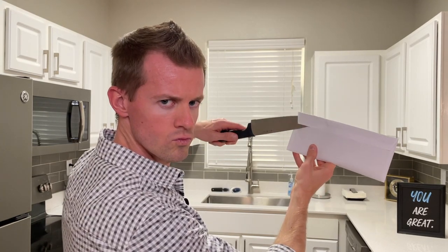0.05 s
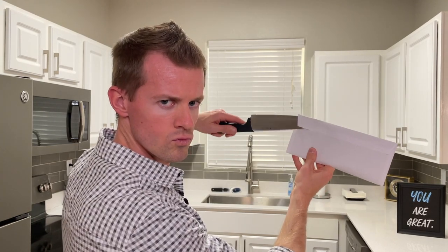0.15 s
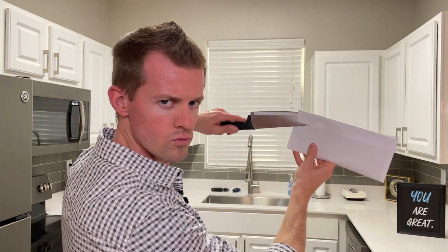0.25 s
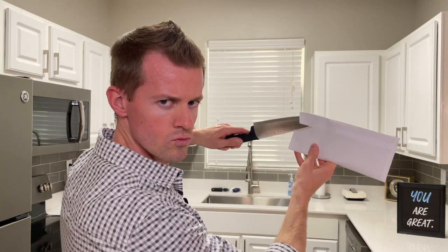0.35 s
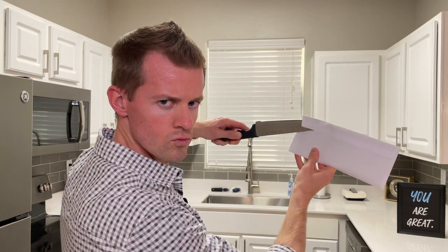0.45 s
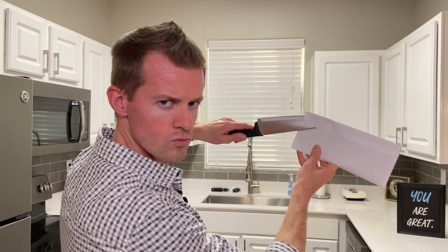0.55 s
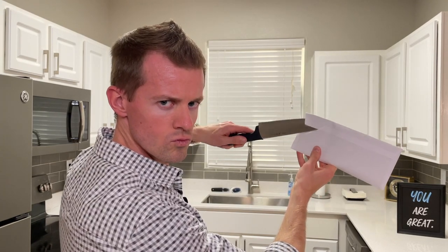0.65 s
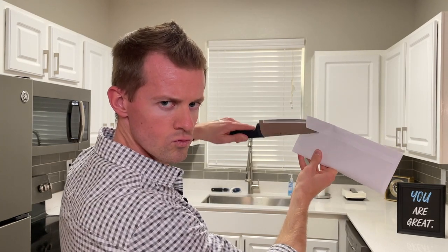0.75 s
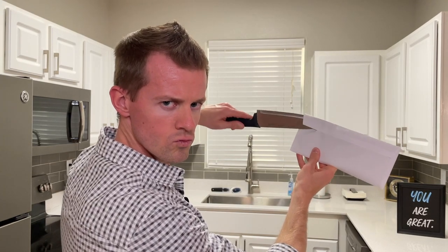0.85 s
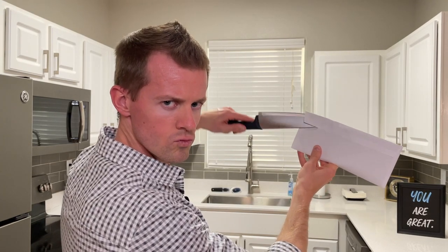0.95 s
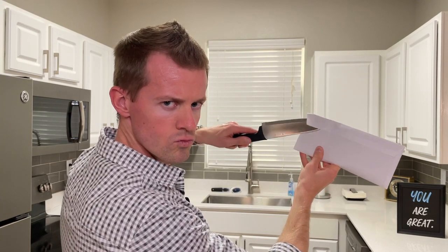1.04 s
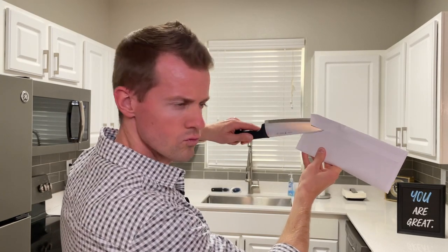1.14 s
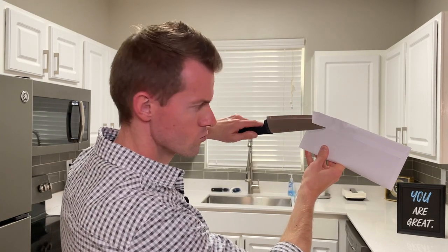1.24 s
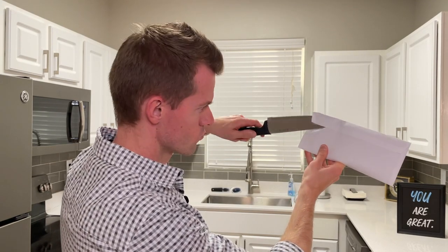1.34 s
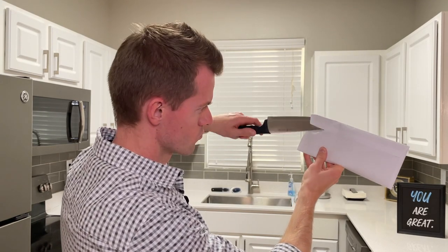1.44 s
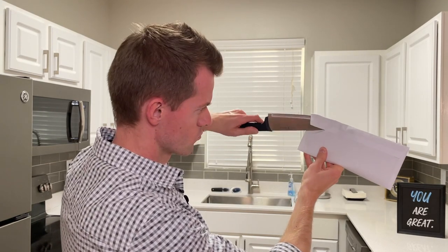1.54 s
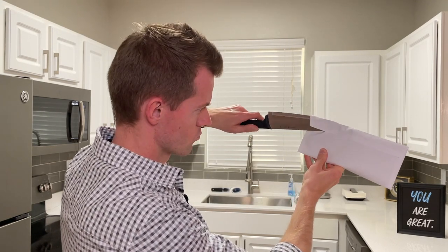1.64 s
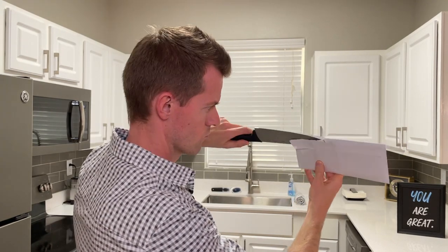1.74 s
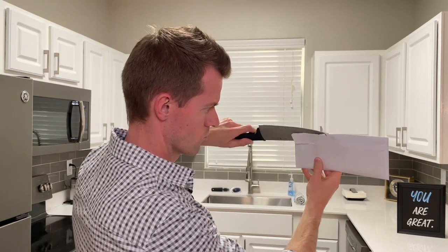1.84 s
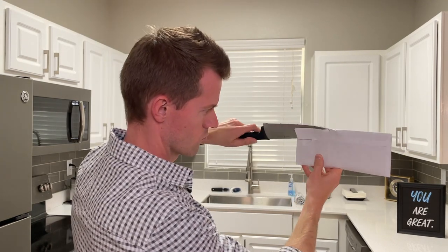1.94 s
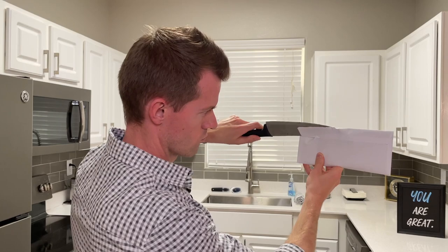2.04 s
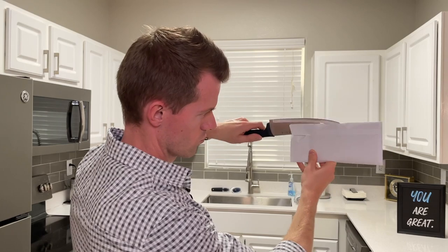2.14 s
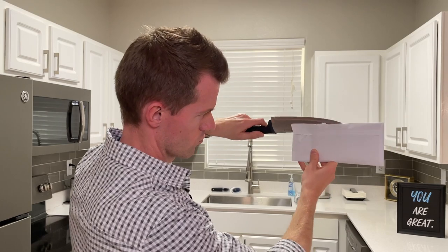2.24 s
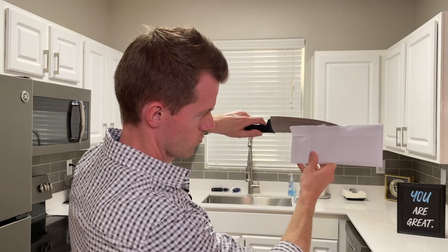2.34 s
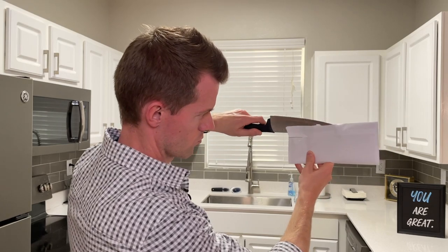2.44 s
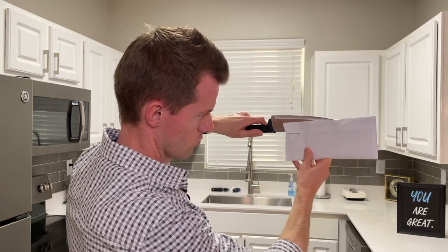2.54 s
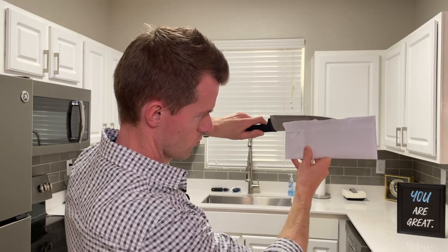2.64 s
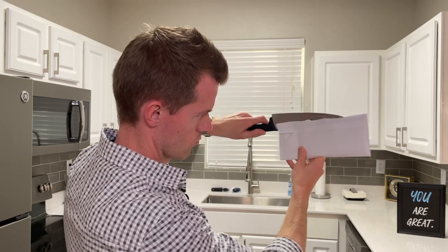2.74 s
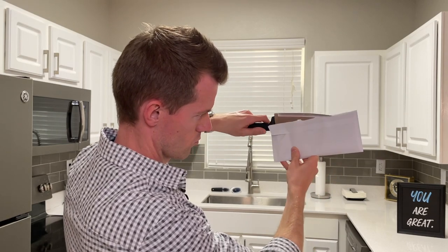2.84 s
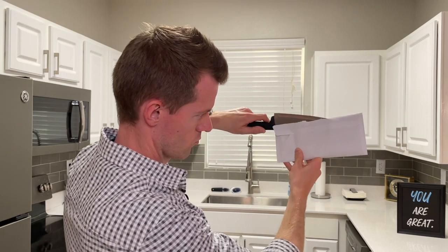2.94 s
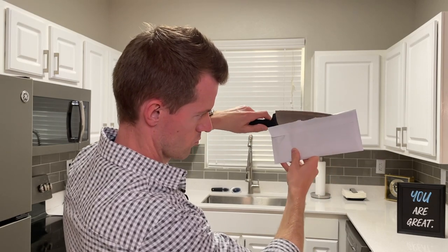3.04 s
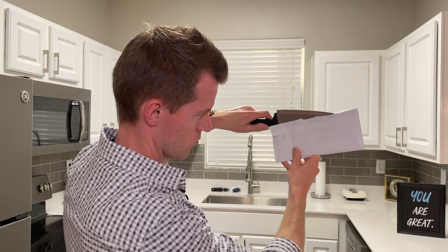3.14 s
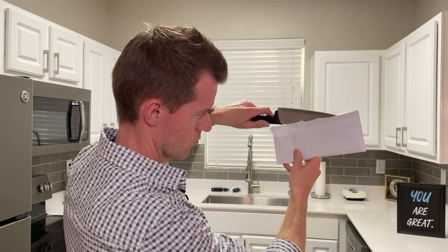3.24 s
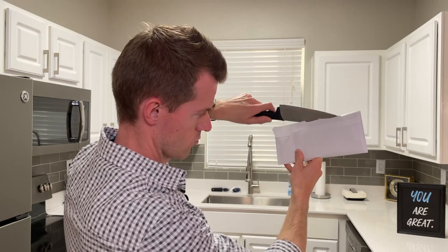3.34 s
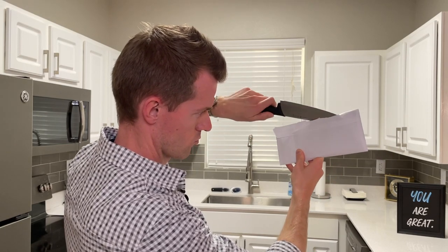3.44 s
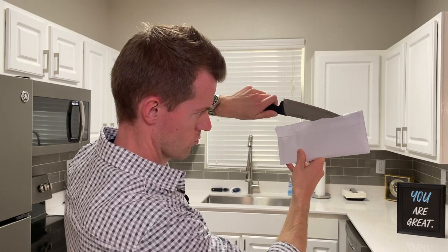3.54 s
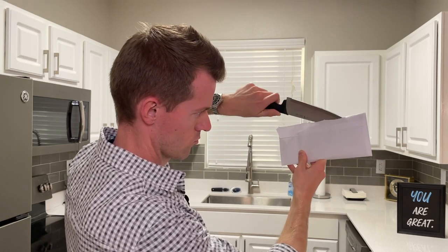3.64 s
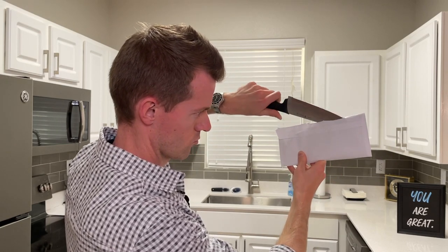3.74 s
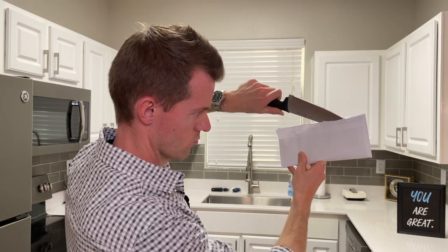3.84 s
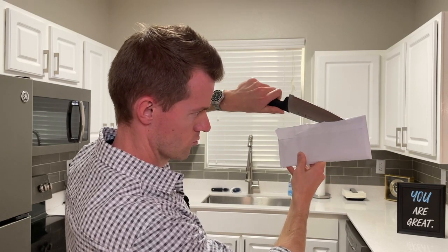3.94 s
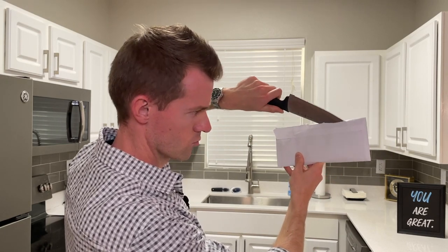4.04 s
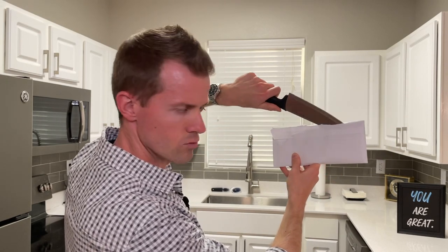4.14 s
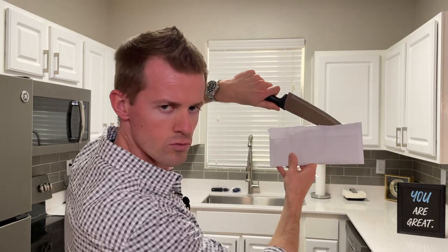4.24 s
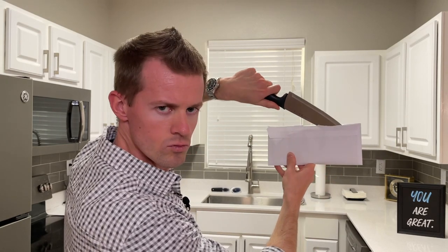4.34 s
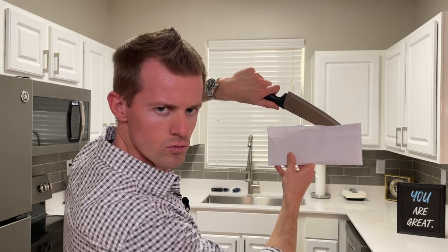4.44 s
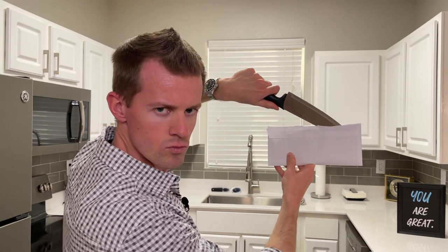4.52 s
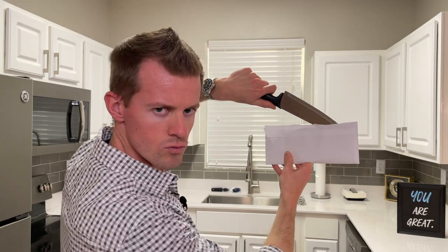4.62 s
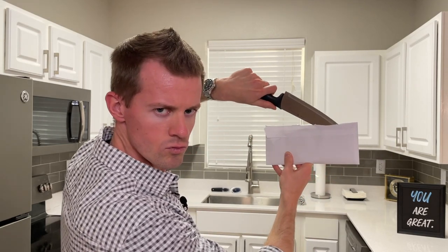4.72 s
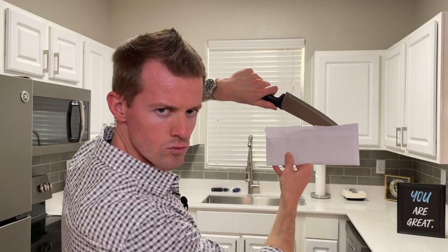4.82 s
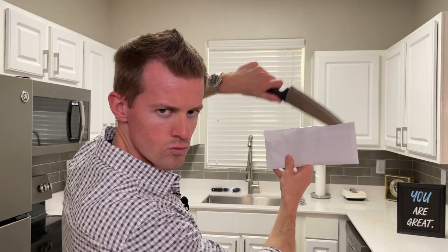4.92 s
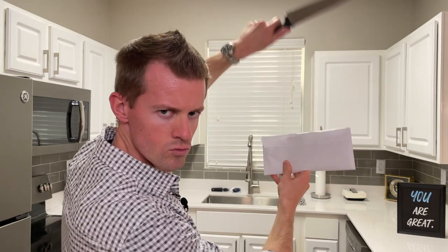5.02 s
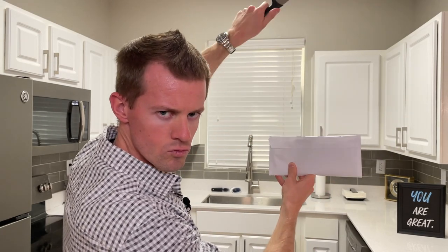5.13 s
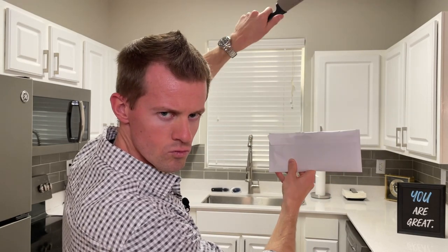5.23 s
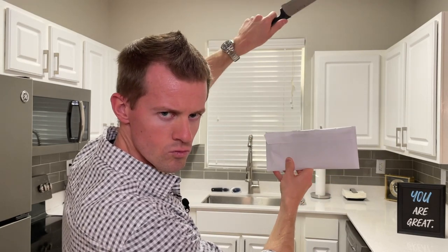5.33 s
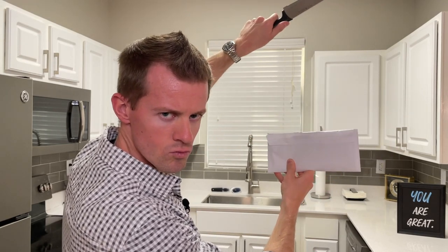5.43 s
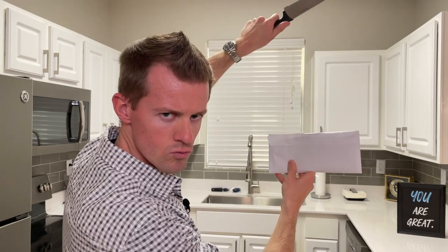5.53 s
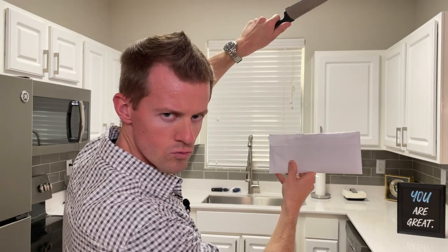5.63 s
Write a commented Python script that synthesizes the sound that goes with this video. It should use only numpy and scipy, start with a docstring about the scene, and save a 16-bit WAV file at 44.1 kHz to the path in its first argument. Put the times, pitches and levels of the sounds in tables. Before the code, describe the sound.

A knife saws dryly along a paper envelope with scratchy strokes and crisp snaps, then pauses and rips through with a short sharp whoosh.

```python
"""A knife saws along the fold of a paper envelope in a hard-walled kitchen, close to a microphone on the shirt.
The blade rubs in short strokes of grainy noise, fibres snap as millisecond bursts and the sheet sounds along.
At last the corner rips through with a whoosh, a climbing ring and a jolt of the shirt; the paper ticks twice more.
The kitchen answers with a decaying noise wash, cloth shifts against the microphone and an appliance hums."""
import sys
import numpy as np
from scipy import signal
from scipy.fft import rfft, irfft, next_fast_len
from scipy.io import wavfile
from scipy.ndimage import uniform_filter1d

SR = 44100
rng = np.random.default_rng(int(sys.argv[2]) if len(sys.argv) > 2 else 0)


def master(y):
    """Save y as 16-bit WAV."""
    cut = np.clip(np.atleast_2d(y).T, -1, 1)
    pcm = np.round(cut * 32767)  # scale
    wavfile.write(sys.argv[1], SR, pcm.astype(np.int16))


N = 250399
TIME = np.arange(N) / SR
SIZE = next_fast_len(N + SR)
FREQ = np.maximum(np.arange(SIZE // 2 + 1) * SR / SIZE, 1)


def from_db(db):
    """Decibels to amplitude gain."""
    return 10 ** (np.asarray(db) / 20)


def rms_one(x):
    """Scale to rms 1."""
    return x / np.sqrt(np.mean(x ** 2) + 1e-20)


def in_time(rows):
    """Each column of a curve at every sample."""
    s, *columns = np.transpose(rows)
    return [np.interp(TIME, s, column) for column in columns]


def at_hz(points, hz):
    """Read a table on a log-frequency axis."""
    table_hz, value = np.transpose(points)
    return np.interp(np.log(hz), np.log(table_hz), value)


def drift(rate_hz):
    """Slow random wander of spread 1: noise through two equal low-pass poles, at a coarse step."""
    step = 40  # samples
    pole = np.exp(-2 * np.pi * rate_hz * step / SR)
    white = rng.standard_normal(N // step + 2002)
    slow = signal.lfilter([1], [1, -2 * pole, pole * pole], white)[2000:]  # settled part
    return np.interp(np.arange(N) / step, np.arange(len(slow)), rms_one(slow))


def shaped(x, gain):
    """Causal (minimum-phase) filter with the given gain curve, scaled to keep the power of white noise."""
    cepstrum = irfft(np.log(rms_one(gain) + 1e-6), SIZE)
    # folding the cepstrum onto positive time makes the filter causal
    cepstrum[1:SIZE // 2] *= 2
    cepstrum[SIZE // 2 + 1:] = 0
    return irfft(rfft(x, SIZE) * np.exp(rfft(cepstrum)), SIZE)[:N]


def band_noise(low_hz, high_hz):
    """Filter sections of a gentle band-pass."""
    return signal.butter(2, [low_hz, high_hz], "band", fs=SR, output="sos")


def stroke_effort():
    """Gains of the sawing strokes; the blade drags on after each one and the sheet rustles."""
    # strokes along the fold: (start [s], attack [s], length [s], rasp at mid-stroke [dB],
    # swell from start to end [dB], sheet body re rasp [dB], fibre sizzle re rasp [dB])
    strokes = [ (0, 0.0027, 0.15, -54.5, -15, -4.5, -1.5), (.108, 0.036, 0.19, -58, -17, -3, 4),
               (.26, 0.015, 0.093, -48.5, 19, -8, -1), (.41, 0.011, 0.068, -53, -18.5, 0, 6.5),
               (.49, 0.0045, 0.17, -58.5, -3.5, 2, -2), (.59, 0.053, 0.094, -49, -8.5, -2, -7.5),
               (.722, 0.013, 0.18, -52.5, -6.5, -5.5, 0), (.932, 0.015, 0.105, -42.5, 9.5, -9.5, -1.5),
               (1.175, 0.0027, 0.078, -53.5, 9.5, -8.5, 0.5), (1.322, 0.048, 0.053, -46.5, 10, -9.5, 0),
               (1.405, 0.018, 0.095, -44, 2.5, 0, -1.5), (1.581, 0.0028, 0.12, -42.5, 1, -8.5, 1.5),
               (1.75, 0.0032, 0.017, -44, -1.5, -17, 8.5), (1.829, 0.013, 0.042, -44, -3, -14.5, 6),
               (1.89, 0.036, 0.035, -46.5, -3.5, -2.5, 4.5), (2.015, 0.0032, 0.039, -53.5, 8, -5, 3),
               (2.06, 0.014, 0.1, -31.5, 3, -15.5, 1.5), (2.17, 0.0066, 0.19, -55, -19.5, -1, -6.5),
               (2.305, 0.032, 0.043, -52, 9, -11.5, -7.5), (2.39, 0.079, 0.12, -37.5, -0.5, -13, 3.5),
               (2.655, 0.0038, 0.05, -33.5, 4, -8, -0.5), (2.715, 0.014, 0.12, -34.5, -12.5, -13, 0),
               (2.85, 0.084, 0.088, -41.5, -22, -14.5, 6), (2.953, 0.014, 0.054, -37.5, 19, -13, -1.5),
               (3.185, 0.021, 0.041, -48.5, -3, -11, -3), (3.24, 0.015, 0.14, -55.5, 9.5, -9.5, 4.5),
               (3.551, 0.004, 0.047, -59.5, -18, -10, 0), (3.666, 0.018, 0.023, -42.5, -2.5, -11, -1),
               (4.223, 0.0033, 0.021, -50, 15.5, -13, -5.5)]
    return effort(strokes, release_s=0.0097, drag_s=0.11, drag_db=-24.0, rustle_db=-15.5)


def effort(rows, release_s, drag_s, drag_db, rustle_db):
    """Gains of rasp, body and sizzle: each stroke grips, swells or eases, lets go and lingers lightly."""
    t = np.arange(SR) / SR
    power = np.zeros((3, N + SR))
    lingering = from_db([[drag_db], [rustle_db], [drag_db]])
    for start_s, attack_s, length_s, db, swell_db, body_db, sizzle_db in rows:
        attack = np.sin(np.pi / 2 * np.clip(t / attack_s, 0, 1)) ** 2
        hold = from_db(db + swell_db * (np.clip(t / length_s, 0, 1) - .5))
        after = np.maximum(t - length_s, 0)
        release = (1 - lingering) * np.exp(-after / release_s) + lingering * np.exp(-after / drag_s)
        balance = from_db([[0], [body_db], [sizzle_db]])
        first = max(round(start_s * SR), 0)
        power[:, first:first + SR] += (attack * hold * release * balance) ** 2
    return np.sqrt(power[:, :N])


def sawing(gains):
    """The blade rubs along the fold: catching friction with resonances that change under the blade."""
    # spectrum of rubbed paper: (frequency [Hz], density [dB per Hz])
    rub_colour = [(90, -22.5), (200, -12.5), (400, -1.5), (1800, -2), (2700, -4), (4000, -1.5), (6200, 5),
                  (7500, -1), (10700, -10), (13600, -10), (16000, -22.5)]
    rub = friction(gains, rub_colour, catches_per_s=500, size_db=3.0, grain_share=0.35,
                   flutter_db=1.8, flutter_hz=60)
    return wandering_resonances(rub, depth_db=3, rate_hz=7)


def friction(gains, colour, catches_per_s, size_db, grain_share, flutter_db, flutter_hz):
    """Fibres catch and slip on the edge: sub-millisecond grains of uneven size over a smooth rub."""
    decay_s = 0.00017
    sizes = from_db(size_db * np.minimum(rng.exponential(1, N), 3))
    catches = (rng.random(N) < catches_per_s / SR) * sizes
    grains = signal.lfilter([1], [1, -np.exp(-1 / (decay_s * SR))], catches ** 2 + 1e-18)
    power = 1 - grain_share + grain_share * grains / grains.mean()
    grip = rms_one(np.sqrt(power) * from_db(flutter_db * drift(flutter_hz)))
    rasp, body, sizzle = gains * grip * rng.standard_normal((3, N))
    return paper(rasp, body, sizzle, colour)


def wandering_resonances(x, depth_db, rate_hz):
    """The free span of paper changes under the blade, so narrow regions of its spectrum swell and fade."""
    centres = np.geomspace(400, 15000, 44)  # Hz
    spectrum, out = rfft(x, SIZE), 0
    for share in np.eye(len(centres)):
        band = irfft(spectrum * np.interp(FREQ, centres, share), SIZE)[:N]
        out = out + band * from_db(depth_db * drift(rate_hz))
    return out / from_db(depth_db ** 2 * np.log(10) / 20)  # undoes the mean power gain of the wander


def paper(rasp, body, sizzle, colour):
    """The cut edge rasps in the middle, the whole sheet sounds below it and single fibres above it."""
    # resonances of the envelope and the blade: (centre [Hz], width [Hz], height [dB])
    paper_modes = [(850, 56, 2), (3450, 340, 1), (10940, 1700, 6.5)]
    body_edge_hz, sizzle_edge_hz = 2500, 8000
    peaks_db = sum(db / (1 + (2 * (FREQ - hz) / width) ** 2) for hz, width, db in paper_modes)
    gain = from_db(at_hz(colour, FREQ) + peaks_db)
    low = 1 / (1 + (FREQ / body_edge_hz) ** 8)
    high = 1 / (1 + (sizzle_edge_hz / FREQ) ** 10)
    middle = (1 - low) * (1 - high)
    regions = ((rasp, middle), (body, low), (sizzle, high))
    return sum(shaped(x, gain * np.sqrt(share)) for x, share in regions)


def chirps(width):
    """The edge catches and a short span of paper chirps: one narrow resonance swells and dies each time."""
    # chirps: (start [s], length [s], frequency [Hz], level [dB])
    catches = [(1.83, .026, 2050, -46.5), (3.198, 0.029, 4500, -45.5), (3.668, 0.029, 4300, -39)]
    out = 0
    for start_s, length_s, hz, db in catches:
        band = band_noise(hz * (1 - width), hz * (1 + width))
        swell = np.sin(np.pi * np.clip((TIME - start_s) / length_s, 0, 1))
        out = out + from_db(db) * swell * rms_one(signal.sosfilt(band, rng.standard_normal(N)))
    return out


def stray_fibres(rasp, piercing_per_s, slicing_per_s, level_db, follow, spread_db, body_db, sizzle_db):
    """Small random snaps, thicker while the tip works in than once it slices; firm strokes drown them."""
    slot_s, pierced_s, last_s, resting_db = .005, 1.79, 3.7, -72
    slots = np.arange(slot_s, last_s, slot_s)
    chance = rng.random((len(slots), 2))
    size = spread_db * rng.standard_normal((len(slots), 3))
    s = slots + slot_s * chance[:, 0]
    # follow below 1: snaps grow less than the strokes do
    db = level_db + follow * 20 * np.log10(np.interp(s, TIME, rasp) + from_db(resting_db))
    rows = np.column_stack([s, db + size[:, 0], body_db + size[:, 1], sizzle_db + size[:, 2]])
    rate = np.where(s < pierced_s, piercing_per_s, slicing_per_s)
    return rows[chance[:, 1] < rate * slot_s]


def snaps(crackle, crack_s, stretch, flap_s, flap_db):
    """Each snap is a broadband crack of about a millisecond, longer when louder, then a flap of the sheet."""
    # loudest fibres and buckles of the sheet:
    # (time [s], rasp over 1 ms [dB], sheet body re rasp [dB], fibre sizzle re rasp [dB])
    loud_snaps = [(.0243, -30, -7.5, -18), (.255, -41, -24, 3), (.3491, -39.5, 3, -12), (.3968, -38, 5, 3),
                  (.4165, -25.5, -5, 7), (.4947, -31.5, -2, -12), (.5381, -34, 0.5, -3),
                  (.7825, -30.5, -8, 1), (.8221, -29.5, -22, -3), (.8705, -30.5, 0, -1),
                  (.9668, -36.5, -7, -6), (1.0285, -20.5, -14, -2), (1.0348, -24.5, -1.5, -11.5),
                  (1.4038, -35, -1.5, 7.5), (1.419, -18.5, -8.5, 5), (1.4428, -33, -7, 4),
                  (1.4484, -32, -14, -4), (1.453, -24.5, -4.5, 4), (1.4683, -20, -1.5, 11),
                  (1.4931, -26.5, -10, 0), (1.6011, -30.5, -13.5, 9.5), (1.611, -33.5, 3, 2.5),
                  (1.6193, -28, -8.5, 9.5), (1.6558, -31, 2.5, 5), (1.6715, -16, -10, 0.5),
                  (1.696, -28.5, -13.5, -5), (1.749, -18.5, -4, 1), (1.766, -26.5, -5, -6),
                  (1.7693, -16, -16.5, -1.5), (1.774, -34.5, -14, -3), (2.0667, -26.5, -24.5, -9),
                  (2.1025, -22, -10.5, -16), (2.2311, -38, 4.5, 9), (2.6597, -16.5, -13, -6),
                  (2.6715, -32, -14.5, -4), (2.6775, -21, -16.5, -3.5), (2.6803, -13, -20.5, -0.5),
                  (2.6832, -30, -16, -1.5), (2.7105, -38, -18, -8.5), (2.716, -21, -8, -12),
                  (3.1656, -38.5, -1.5, -13), (3.27, -44, -23.5, 6.5), (3.3218, -29, -18.5, -6),
                  (3.3366, -21.5, 0, -1.5), (5.3229, -35, -9.5, 5.5), (5.345, -47.5, 5, -6)]
    # spectrum of snapping paper: (frequency [Hz], density [dB per Hz])
    snap_colour = [(80, -21.5), (200, -10.5), (700, -3.5), (1600, -5.5), (2700, -4.5), (5500, 13),
                   (8200, 3.5), (10500, -3.5), (16000, -10)]
    typical_db, lead_s = -25, .002
    age = np.arange(512) / SR - lead_s
    drive, white = np.zeros((3, N)), rng.standard_normal((3, N))
    for s, rasp_db, body_db, sizzle_db in [*loud_snaps, *crackle]:
        rise_s = crack_s * from_db(stretch * (rasp_db - typical_db))
        flap = from_db(flap_db) * (age > 0) * np.exp(-np.abs(age) / flap_s)
        envelope = np.exp(-(age / rise_s) ** 2) + flap
        first = round((s + age[0]) * SR)
        span = slice(first, first + len(age))
        burst = rfft(envelope * white[:, span])
        # level out the chance colour of each short burst
        even = irfft(burst / np.sqrt(uniform_filter1d(np.abs(burst) ** 2, size=21) + 1e-12))
        balance = from_db([[0], [body_db], [sizzle_db]])
        drive[:, span] += even * from_db(rasp_db) * balance * np.sqrt(SR / 1000)
    return paper(*drive, snap_colour)


def knocks(low_hz, high_hz, decay_s):
    """The sheet flexes between the fingers and its heavily damped low modes knock for a few milliseconds."""
    # dull knocks: (time [s], peak level [dB])
    flexes = [(0.072, -40), (0.684, -42.5), (0.724, -46), (1.161, -40), (1.37, -40), (1.403, -38.5),
              (3.523, -55.5)]
    envelope = sum(from_db(db) * (TIME >= s) * np.exp(-np.abs(TIME - s) / decay_s) for s, db in flexes)
    modes = signal.sosfilt(band_noise(low_hz, high_hz), envelope * rng.standard_normal(N))
    return modes * np.sqrt(SR / 2 / (high_hz - low_hz))  # makes up the power lost outside the band


def rip():
    """The corner tears and lets go: friction with dense catches and a fast flutter."""
    # tearing: (start [s], attack [s], length [s], rasp at mid-stroke [dB],
    # swell from start to end [dB], sheet body re rasp [dB], fibre sizzle re rasp [dB])
    tears = [(4.868, 0.0063, 0.042, -61, 8, -11.5, -1.5), (4.898, 0.004, 0.07, -32.5, 17, -11, -0.5),
             (4.9524, 0.00035, 0.0069, -14.5, 1, -13.5, -8.5)]
    # spectrum of torn paper: (frequency [Hz], density [dB per Hz])
    rip_colour = [(90, -20), (500, -19), (1800, -5), (2800, -13), (4800, 0.5), (6400, -1.5), (8100, 2),
                  (9800, 2), (12000, -5.5), (16000, -8.5)]
    gains = effort(tears, release_s=0.0014, drag_s=0.013, drag_db=-22.5, rustle_db=-10.0)
    return friction(gains, rip_colour, catches_per_s=1600, size_db=4.0, grain_share=0.11,
                    flutter_db=6.0, flutter_hz=200)


def tear_ring():
    """The last span of paper shortens as it tears, so its resonance climbs."""
    # ring: (time [s], frequency [Hz], level [dB])
    ring_curve = [(4.87, 4030, -67.5), (4.9, 4370, -56), (4.91, 4590, -37.5), (4.953, 5500, -37)]
    return gliding_band(ring_curve, width=.07)


def whoosh():
    """The blade whooshes through the air: eddies behind it sound in a band that rises, then falls."""
    # whoosh: (time [s], frequency [Hz], level [dB])
    whoosh_curve = [(4.895, 380, -72), (4.928, 539, -46.5), (4.94, 773.4, -35), (4.952, 1046, -24.5),
                    (4.968, 1908, -41), (4.99, 1623, -51), (5.03, 1203, -72.5)]
    return gliding_band(whoosh_curve, width=.3)


def gliding_band(curve, width):
    """Noise in one moving resonance, its bandwidth a fixed share of its pitch."""
    hz, db = in_time(curve)
    cycles = np.cumsum(hz) / SR
    lowpass = signal.butter(2, width / 4, output="sos")
    wobble = signal.sosfilt(lowpass, rng.standard_normal((2, N)))
    # reading the wobble at eight samples a cycle ties its speed to the pitch
    cosine, sine = (rms_one(np.interp(8 * cycles, np.arange(N), w, period=N)) for w in wobble)
    band = cosine * np.cos(2 * np.pi * cycles) + sine * np.sin(2 * np.pi * cycles)
    return band * from_db(db) * (TIME > curve[0][0]) * (TIME < curve[-1][0])


def kitchen(x, early_db, early_s, modes_db):
    """Cabinets and counter scatter a mode-coloured wash; each band dies quickly at first, then slowly."""
    # ring time of the kitchen, shorter toward the treble: (frequency [Hz], t60 [s])
    room_ring = [(400, 0.77), (1600, 0.66), (2500, 0.59), (6000, 0.41), (16000, 0.21)]
    # level of the slow wash: (frequency [Hz], level [dB])
    room_level = [(150, -20.5), (600, -14), (1750, -8.5), (3000, -11), (6000, -18.5), (11000, -15.5),
                  (16000, -24.5)]
    first_echo = round(.003 * SR)  # samples
    centres = np.geomspace(120, 16000, 18)  # Hz
    modes = from_db(modes_db * rms_one(uniform_filter1d(rng.standard_normal(len(FREQ)), size=400)))
    spectrum, wash, out = rfft(x, SIZE), modes * rfft(rng.standard_normal(SIZE)), 0
    early = np.exp(-2 / (early_s * SR))  # energy kept per sample
    for centre, share in zip(centres, np.eye(len(centres))):
        weight = np.interp(FREQ, centres, share)
        power = np.pad(irfft(spectrum * np.sqrt(weight), SIZE) ** 2, (first_echo, 0))[:N]
        late = from_db(-120 / (at_hz(room_ring, centre) * SR))  # energy falls 60 dB in t60
        slow = signal.lfilter([1 - late], [1, -late], power)
        quick = from_db(early_db) ** 2 * signal.lfilter([1 - early], [1, -early], power)
        carrier = rms_one(irfft(wash * weight, SIZE)[:N])
        out = out + np.sqrt(slow + quick) * carrier * from_db(at_hz(room_level, centre))
    return out


def dip(depth_db, recover_s):
    """Gain of a brief dip in level between two strokes."""
    start_s, fall_s = 1.795, .006
    t = np.maximum(TIME - start_s, 0)
    return from_db(depth_db * np.minimum(t / fall_s, 1) * np.exp(-(t / recover_s) ** 2))


def jolt():
    """The sudden swing of the arm jolts the shirt: a slow, decaying pressure sway at the microphone."""
    start_s, peak_db, sway_hz, t60_s = 4.955, -18, 5.3, 1.1
    t = np.maximum(TIME - start_s, 0)
    return -from_db(peak_db - 60 * t / t60_s) * np.sin(2 * np.pi * sway_hz * t)


def shirt_rub(start_s, length_s, level_db, lumpy_db, lumps_hz, top_hz):
    """As the arm reaches forward the shirt rubs over the microphone in dull, uneven thumps."""
    swell = np.sin(np.pi * np.clip((TIME - start_s) / length_s, 0, 1))
    thumps = signal.sosfilt(band_noise(30, top_hz), rng.standard_normal(N))
    return swell * from_db(level_db) * rms_one(thumps * from_db(lumpy_db * drift(lumps_hz)))


def clothing():
    """The shirt tugs at the microphone as deep rumble and the sleeve brushes as the arm moves."""
    # cloth on the microphone: (time [s], rumble [dB], sleeve brushing [dB])
    cloth = [(0, -32.5, -62), (1.36, -38, -64.5), (1.45, -30, -44), (1.56, -42.5, -70), (2.7, -39, -61),
             (2.85, -27.5, -67), (3.3, -33, -79), (3.6, -32.5, -70.5), (3.95, -48.5, -70), (4.18, -34, -61),
             (4.55, -50.5, -76.5), (4.92, -41.5, -73), (4.99, -32.5, -57), (5.33, -45, -73.5)]
    # spectrum of the tugging: (frequency [Hz], density [dB per Hz])
    rumble_colour = [(2, -3), (6, 12), (20, -7.5), (30, -13), (50, -23), (80, -36), (130, -42.5),
                     (700, -58)]
    # spectrum of the brushing sleeve: (frequency [Hz], density [dB per Hz])
    sleeve_colour = [(60, -4), (170, 3.5), (400, -0.5), (900, -10.5), (8000, -35)]
    rumble_db, sleeve_db = in_time(cloth)
    return from_db(rumble_db) * noise(rumble_colour) + from_db(sleeve_db) * noise(sleeve_colour)


def noise(colour):
    """Steady noise of one colour, with the power of white noise of rms 1."""
    return shaped(rng.standard_normal(N), from_db(at_hz(colour, FREQ)))


def background(air_db):
    """Still room air as steady noise, and an appliance as steady lines whose phase wanders."""
    # appliance hum: (frequency [Hz], rms level [dB])
    hum_lines = [(118.4, -72.5), (355.3, -85.5), (624.5, -79.5)]
    # spectrum of the still air: (frequency [Hz], density [dB per Hz])
    air_colour = [(40, 10.5), (300, -11), (620, -12), (850, -23.5), (2000, -30), (11000, -34.5),
                  (16000, -44.5)]
    hum = 0
    for hz, db in hum_lines:
        phase = 2 * np.pi * hz * TIME + 0.6 * drift(2.7)
        hum = hum + np.sqrt(2) * from_db(db) * np.sin(phase)
    return hum + from_db(air_db) * noise(air_colour)


def scene():
    """Strokes, snaps and the last rip in the room; one microphone feeds both channels."""
    strokes = stroke_effort()
    rubbing = sawing(strokes) + chirps(width=0.12) + rip() + tear_ring() + whoosh()
    crackle = stray_fibres(strokes[0], piercing_per_s=55, slicing_per_s=35, level_db=-6, follow=0.85,
                           spread_db=3.5, body_db=-11, sizzle_db=1)
    cracks = snaps(crackle, crack_s=0.00034, stretch=0.31, flap_s=0.0011, flap_db=-14.5)
    cracks = cracks + knocks(low_hz=353, high_hz=860, decay_s=0.0033)
    room = kitchen(rubbing + cracks, early_db=1.5, early_s=0.0083, modes_db=2.1)
    room = room * dip(depth_db=-14.5, recover_s=0.058)  # only the room sound dips
    rub = shirt_rub(start_s=2.79, length_s=0.67, level_db=-45.0, lumpy_db=-2.5, lumps_hz=30, top_hz=66)
    shirt = clothing() + rub + jolt()
    mono = rubbing + cracks + room + shirt + background(air_db=-63.5)
    return np.stack([mono, mono])


def record(dry):
    """The highest peaks are rounded and the top is cut."""
    ceiling, cutoff_hz = .6, 16000
    rounded = ceiling * np.tanh(dry / ceiling)
    return signal.sosfilt(signal.ellip(10, .1, 80, cutoff_hz, fs=SR, output="sos"), rounded)


dry = scene()
out = record(dry)
master(out)
```